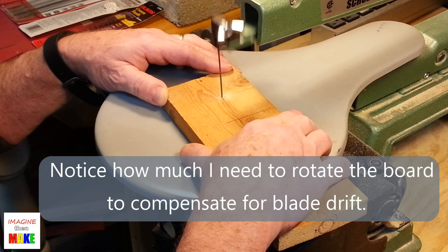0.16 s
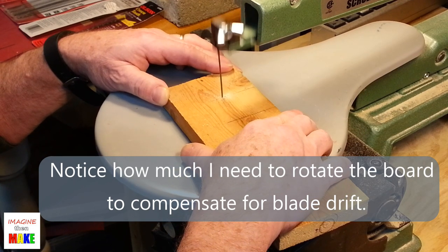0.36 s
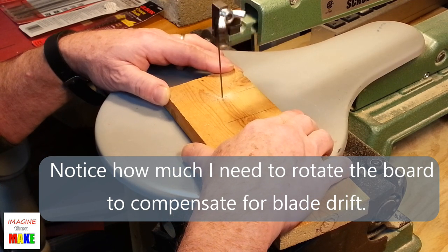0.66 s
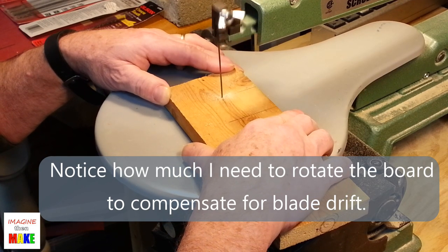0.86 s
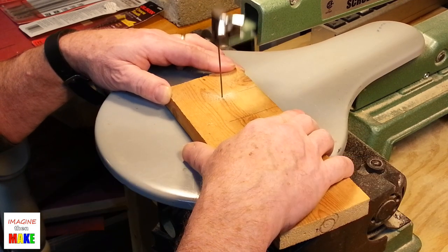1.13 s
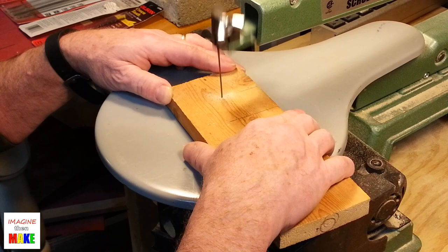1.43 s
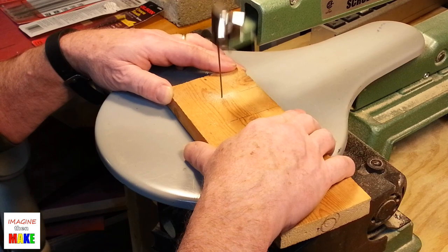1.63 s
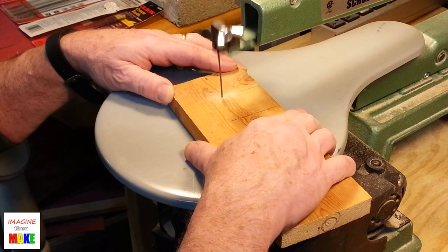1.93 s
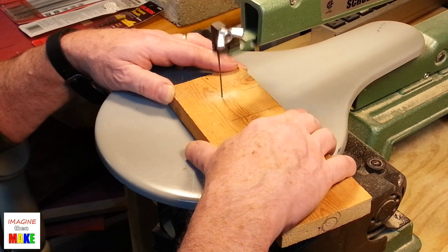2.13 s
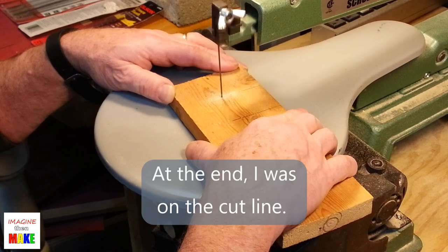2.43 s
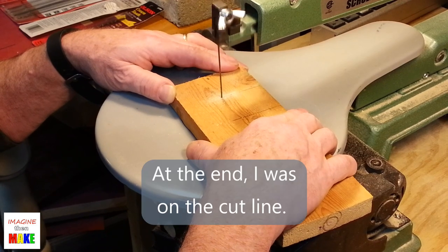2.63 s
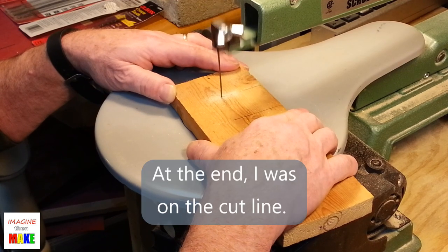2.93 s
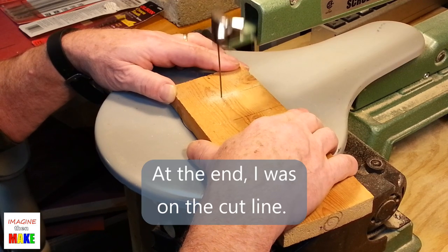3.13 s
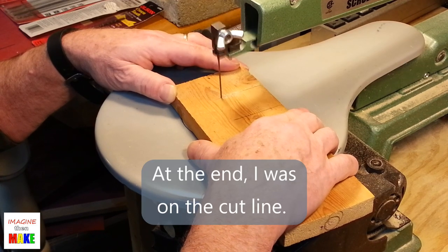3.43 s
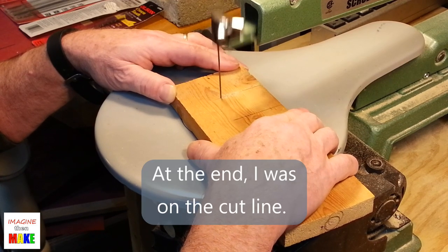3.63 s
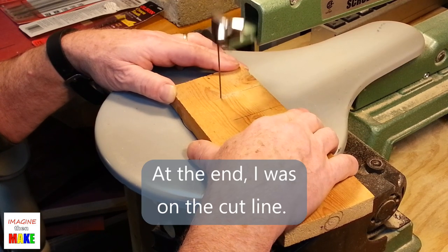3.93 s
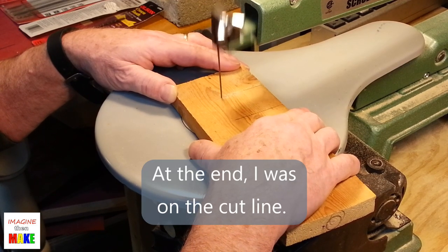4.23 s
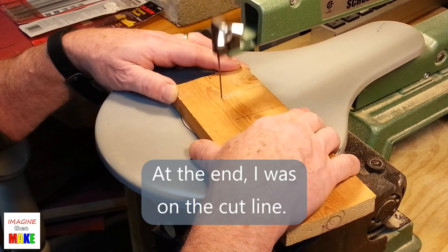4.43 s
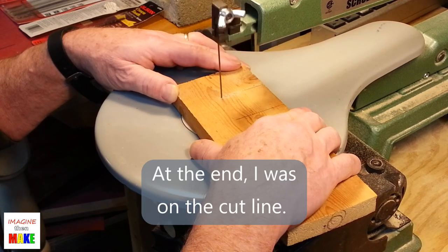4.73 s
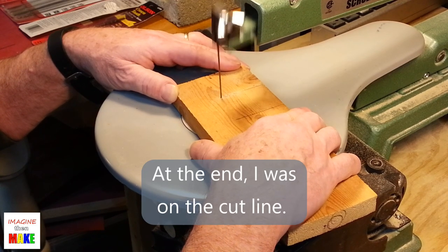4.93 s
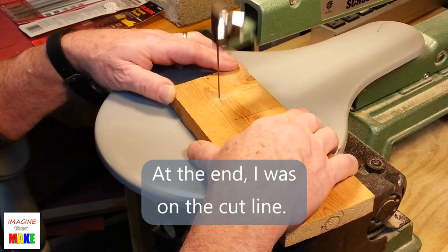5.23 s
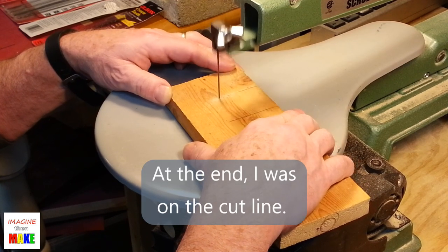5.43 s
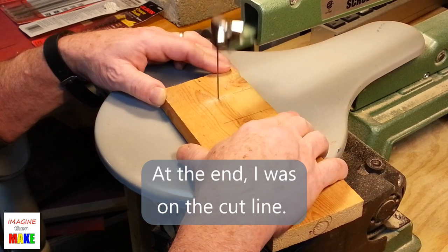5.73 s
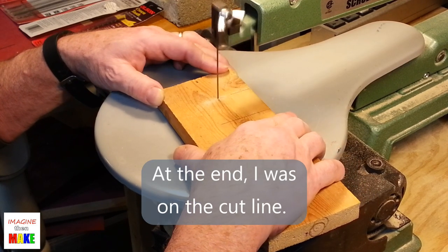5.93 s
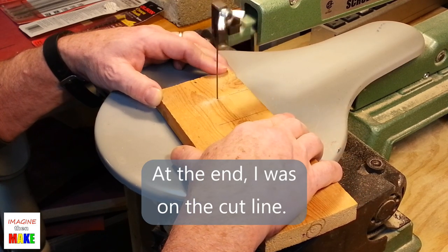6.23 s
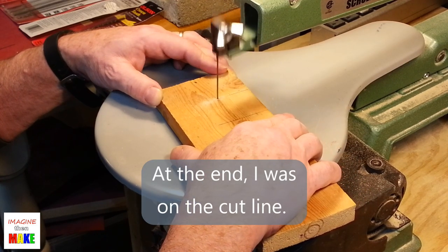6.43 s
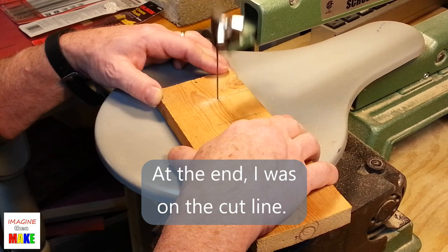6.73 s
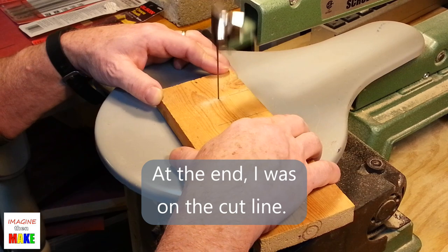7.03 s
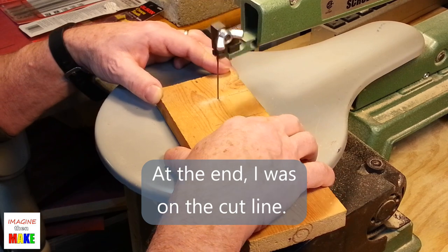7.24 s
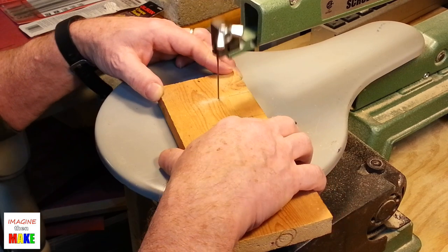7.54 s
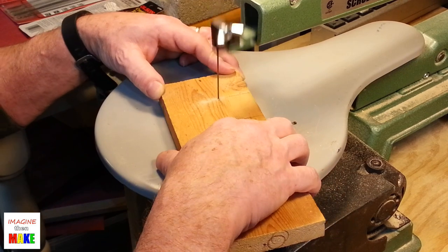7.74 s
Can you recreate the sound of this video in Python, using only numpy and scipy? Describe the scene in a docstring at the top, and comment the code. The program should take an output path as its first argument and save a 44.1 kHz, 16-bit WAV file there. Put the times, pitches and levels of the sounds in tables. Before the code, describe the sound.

A scroll saw cuts a pine board in a small workshop, heard close in stereo. Fast, gritty blade strokes rasp over a steady low motor hum while the board rings, chatters and knocks on the iron table. Early on, loose hollow slaps and splinter cracks stand out. The strokes quicken as the feed eases; after an instant of silence near six seconds, a lighter, rattling cut continues.

```python
"""A scroll saw rasps through a pine board in a small workshop, heard from close by over a motor hum.
The blade rasps on each downstroke and rubs on the way up; the board rings and rattles on the iron table.
Each part is noise, clicks or a tone timed by the crank, mostly shaped by the ringing of what it shakes.
A firm feed goes with slower strokes and more machine shake; now and then the grip eases and the board rattles up.
Near 6.1 s the sound drops out for an instant and a lighter cut goes on."""
import sys
import numpy as np
from scipy import signal
from scipy.fft import rfft, irfft, next_fast_len
from scipy.io import wavfile
from scipy.ndimage import uniform_filter1d, map_coordinates

SR = 44100
rng = np.random.default_rng(int(sys.argv[2]) if len(sys.argv) > 2 else 0)


def inscribe(sig):
    """Save sig as 16-bit PCM at rate SR to the path in sys.argv[1].

    A 1-D sig is mono; a 2-D sig holds one channel per row.
    Samples are clipped to [-1, 1] before scaling.
    """
    pcm = np.round(np.clip(np.atleast_2d(sig).T, -1, 1) * 32767)
    wavfile.write(sys.argv[1], SR, pcm.astype(np.int16))


N = 347067
T = np.arange(N) / SR   # time of every sample, s
SIZE = next_fast_len(N + SR)   # room for the ringing to die away
HZ = np.maximum(np.arange(SIZE // 2 + 1) * SR / SIZE, 1)   # frequency of every spectrum bin

# start and end of the short silence: (t/s, t/s)
BREAK_S = (6.077, 6.094)
# crank speed, sagging under load: (t/s, strokes per s)
SPEED = [(0, 15.15), (.35, 14.61), (1.09, 14.51), (1.78, 14.89), (2.35, 14.84), (3.37, 15.86),
         (3.82, 16.75), (4.1, 16.66), (4.35, 15.59), (4.92, 15.63), (5.32, 17.34), (6.08, 16.68),
         (6.09, 16.69), (6.63, 16.29), (7.04, 16.56), (7.4, 16.32), (7.87, 16.4)]
# how hard the hands feed the board, against a firm push: (t/s, feed/dB)
FEED = [(0, 0), (1.9, 0), (3.4, -1), (3.95, -6), (4.2, 0), (5.0, -2), (5.33, -10.5), (6.09, -9.5),
        (6.17, -4.5), (6.44, -7), (6.56, -5.5), (6.72, -3.5), (7.02, -9), (7.2, -4), (7.52, -8.5),
        (7.69, -6), (7.87, -9.5)]
# ringing modes of the board: (f/Hz, width/Hz, left level/dB, right level/dB)
BOARD_MODES = [(789.6, 32.5, -5.5, -8.5), (1077, 19, -2.5, 3.5), (1890, 50, -17, -16)]
# ringing modes of the arm, tugged on the upstroke and again on the way down:
# (f/Hz, width before repeats or damping/Hz, left level/dB, right level/dB,
#  down tug/turn 0-1, down tug level/dB)
ARM_MODES = [(1827, 67, -1, -1.5, 0.35, -2), (2099, 42, 3.5, -5.5, 0, -3), (2182, 35, 2.5, -3.5, 0, -1.5)]


def from_db(db):
    """Turn decibels into gain."""
    return 10 ** (np.asarray(db) / 20)


def ears_db(left_db, right_db):
    """Gains for the left and right ear."""
    return from_db([[left_db], [right_db]])


def rms_one(x):
    """Scale to unit power."""
    return x / np.sqrt(np.mean(x ** 2) + 1e-20)


def in_time(rows):
    """Read each column of a time curve at every sample."""
    s, *columns = np.transpose(rows)
    return [np.interp(T, s, column) for column in columns]


def in_turn(rows, turns):
    """Read each column of a curve that repeats every turn of the crank."""
    turn, *columns = np.transpose(rows)
    return [np.interp(turns, turn, column, period=1) for column in columns]


def in_frequency(rows):
    """Read each dB column of a spectrum as a gain at every frequency."""
    hz, *columns = np.transpose(rows)
    return from_db([np.interp(np.log(HZ), np.log(hz), column) for column in columns])


def drift(position, count):
    """Wander at random between values drawn at each whole step of position."""
    return np.interp(position, np.arange(count), rng.standard_normal(count))


def filtered(x, response):
    """Pass a signal through a frequency response."""
    return irfft(rfft(x, SIZE) * response, SIZE)[..., :N]


def resonance(hz, width_hz):
    """One damped mode lets through a narrow band, with gain 1 at its peak."""
    return 1 / (1 + 1j * (HZ ** 2 - hz ** 2) / (HZ * width_hz))


def body(colour, modes):
    """An object answers with a broad colour and louder modes, ringing only after the push."""
    power = in_frequency(colour) ** 2
    for hz, width, left, right in modes:
        power = power + np.abs(ears_db(left, right) * resonance(hz, width)) ** 2
    cepstrum = irfft(np.log(power / np.mean(power)), SIZE)
    # keeping one half of the cepstrum makes the ringing follow the push
    n = np.arange(SIZE)
    causal = (1 + np.sign(SIZE // 2 - n)) / 2 - (n == 0) / 2
    return np.exp(rfft(cepstrum * causal))


def struck(rows):
    """Place one click for each (t/s, level/dB) row."""
    blows = np.zeros(N)
    for s, db in rows:
        blows[int(s * SR)] = from_db(db)
    return blows


def taps(turns, at_turn, uneven_db, jitter_s):
    """Click at the same point of every turn, uneven in strength and timing."""
    at = np.flatnonzero(np.diff(np.floor(turns - at_turn)) == 1)
    size, late = rng.standard_normal((160, 2))[:len(at)].T
    places = at + (late * jitter_s * SR).astype(int)
    clicks = np.zeros(N)
    clicks[np.clip(places, 0, N - 1)] = from_db(uneven_db * np.clip(size, -2, 1.5))
    return clicks


def level(law):
    """Set the gain of one part from the feed, the crank speed and the grip.

    A law is (firm-cut level/dB, dB per dB of feed, dB per extra stroke per s,
    share of a loose spell, change after the break/dB)."""
    # the grip eases and the board's freedom changes: (middle t/s, half length/s, level/dB)
    loose_spells = [(0.142, 0.12, 1), (0.783, 0.086, -1), (1.144, 0.09, 2), (1.445, 0.064, 0),
                    (2.518, 0.42, 2), (3.247, 0.12, 2.5), (4.655, 0.27, 1.5)]
    loaded_speed = 15   # strokes per s in a firm cut
    firm_db, per_feed, per_stroke, loose_share, later_db = law
    (feed_db,), (speed,) = in_time(FEED), in_time(SPEED)
    loose_db = sum(db * np.exp(-((T - s) / length) ** 2) for s, length, db in loose_spells)
    db = firm_db + per_feed * feed_db + per_stroke * (speed - loaded_speed)
    db = db + loose_share * loose_db + later_db * (T > np.mean(BREAK_S))
    return from_db(db)


def held(x, firmness, size):
    """The hands damp large swings, so the vibration keeps a more even strength."""
    power = uniform_filter1d(np.mean(rms_one(x) ** 2, axis=0), size=size)
    return rms_one(x * (power + .02) ** (-np.clip(firmness, 0, 1) / 2))


def flexed(x, turns, bend_s, wander_s):
    """Blade tension rises and falls with each stroke, so the ringing bends in pitch."""
    lag = bend_s * np.sin(2 * np.pi * turns) + wander_s * drift(3 * turns, 600)
    return np.array([map_coordinates(ear, [(T - lag) * SR], order=3, mode="nearest") for ear in x])


def hollow(blows, damping, contact_hz):
    """Soft blows ring the low modes of board and table."""
    # board and table together: (f/Hz, width before damping/Hz, left level/dB, right level/dB)
    knock_modes = [(346.5, 16.8, 9, 6.5), (408, 22, 4, 1), (433, 14.5, 2.5, -2.5), (776, 62, -5, -8.5)]
    ring = sum(ears_db(left, right) * resonance(hz, width * damping)
               for hz, width, left, right in knock_modes)
    softness = 1 / (1 + 1j * HZ / contact_hz) ** 2
    return filtered(blows, ring * softness)


def crank():
    """The crank gives strokes per second, which add up to turns made."""
    # crank position at the start and after the break: (turns, turns)
    start_turns = (.698, .058)
    resumed = T > np.mean(BREAK_S)
    speed, = in_time(SPEED)
    before = start_turns[0] + np.cumsum(speed) / SR
    after = start_turns[1] + np.cumsum(speed * resumed) / SR
    return speed, np.where(resumed, after, before) + 100 * resumed   # whole turns keep the phase


def motor(turns, sway, pan_db):
    """Magnetic hum at twice the mains rate sways with the load of each stroke."""
    # hum tones: (multiple of the hum rate, level/dB)
    hum_tones = [(1, -2), (2, -5.5), (3, -15), (4, -22), (5, -16), (6, -21.5)]
    hum_law = (-35.5, 0.55, 0.5, 0, 5.5)
    hum_hz = 120
    hum = sum(from_db(db) * np.sin(2 * np.pi * (multiple * hum_hz * T + rng.random()))
              for multiple, db in hum_tones)
    swing = 1 + sway * np.cos(2 * np.pi * turns)
    return level(hum_law) * np.sqrt(2) * hum * swing * ears_db(pan_db, -pan_db)


def friction(turns, stroke_db, uneven_db, grain_db):
    """Fibres tear in dense grains under the stroke; half strokes differ in strength."""
    # each ear's own noise against the shared noise: (f/Hz, level/dB)
    ear_spread = [(30, 23), (100, -29), (350, -8), (700, -2.5), (1100, 0.5), (2000, 0.5), (4000, 0),
                  (12000, 24)]
    half_strokes = drift(2 * turns, 400)
    teeth = drift(1000 * T, 8000)
    spread = in_frequency(ear_spread)
    shared = rfft(rng.standard_normal(SIZE))
    own = rfft(rng.standard_normal((2, SIZE)))
    hiss = irfft((shared + spread * own) / np.sqrt(1 + spread ** 2), SIZE)[:, :N]
    return rms_one(hiss * from_db(stroke_db + uneven_db * half_strokes + grain_db * teeth))


def blade(turns, stroke_db, rasp_db, catch_db, patchy_db):
    """Teeth and splinters excite the steel, each half stroke favouring other modes."""
    # broad colour of the rasp: (f/Hz, left level/dB, right level/dB)
    rasp_colour = [(200, -32, -14), (596, -14, -4), (1450, -6, -5), (2000, -5, -5), (2400, -9, -10),
                   (2850, -1, -3), (3250, -3, -5), (3750, 2, -6), (4200, -5, -10), (5300, 1, -4),
                   (5900, -7, -8), (6500, -4, -4), (7550, -15, 0), (8200, -19, -11), (9200, -41, -19),
                   (10900, -62, -18), (11500, -65, -66)]
    # blade, clamps and arms: (f/Hz, width/Hz, left level/dB, right level/dB)
    blade_modes = [(3440, 110, 5, -6), (3990, 80, -2, 2), (4590, 60, 9, -5), (4755, 55, 11, 7),
                   (4880, 40, 11, -1), (4972, 50, 15, 8), (5190, 85, 13.5, 2), (6055, 35, -2, 3),
                   (6605, 90, 4, 4), (6922, 38, -7, 14), (7095, 80, 5, 12.5), (7412, 30, -14, 8)]
    feed_db, = in_time(FEED)
    teeth = from_db(feed_db + rasp_db) * friction(turns, stroke_db, uneven_db=0.2, grain_db=0.75)
    force = teeth + from_db(catch_db) * catches(crack_s=0.0034, tear_s=0.023, tear_db=-1.5)
    steel = body(rasp_colour, blade_modes)
    out = 0
    # bands in Hz, each with its own changing share
    for low, high in ((0, 4400), (4400, 4830), (4830, 5080), (5080, 5900), (5900, SR)):
        share_db = patchy_db * drift(2 * turns, 400)
        out = out + from_db(share_db) * filtered(force, steel * (HZ >= low) * (HZ < high))
    return flexed(out, turns, bend_s=1.5e-5, wander_s=2e-5)


def board(turns, ring_stroke_db, rattle_stroke_db):
    """The blade drags the board up and down: it rings and rattles against the table."""
    # broad colours of ringing and rattling: (f/Hz, left level/dB, right level/dB)
    board_colour = [(300, -75, -40), (706, -34, -45), (1080, -31, -62), (2140, -14.5, -35),
                    (2820, -69, -26), (8000, -84, -72)]
    rattle_colour = [(25, -17, -20), (70, -24, -30), (139, 4, 3), (181, -45, -44), (300, -13, -29),
                     (446, -11, -8), (527, 1.5, -22), (835, 4.5, -12), (1300, -32, -43), (4000, -108, -77)]
    # modes of the rattle: (f/Hz, width/Hz, left level/dB, right level/dB)
    rattle_modes = [(222, 6.1, -4, -15), (353.1, 6.8, 17.5, 13), (350, 6.8, -7, 9), (410, 9.4, 5, 8),
                    (760, 11, -3, 4)]
    ring_law = (-33.5, 1.5, -1, 1.5, -5)
    rattle_law = (-39.5, 0, -5.5, 1, 6.5)
    drag = friction(turns, ring_stroke_db, uneven_db=1.0, grain_db=7.5)
    ring = rms_one(filtered(drag, body(board_colour, BOARD_MODES)))
    contacts = friction(turns, 0, uneven_db=-1.5, grain_db=10.0)
    rattle = filtered(contacts, body(rattle_colour, rattle_modes))
    rattle = rms_one(held(rattle, firmness=0.95, size=900) * from_db(rattle_stroke_db))
    return level(ring_law) * ring + level(rattle_law) * rattle


def chatter(turns, load, up_turn, light_db):
    """Each tug of the blade sets the upper arm ringing; the down tug fades in a light cut."""
    chatter_law = (-34, 1.9, 2, 0.7, -24)
    ring = 0
    for hz, width, left, right, down_turn, down_db in ARM_MODES:
        up = taps(turns, up_turn, uneven_db=5.5, jitter_s=0.00121)
        down = taps(turns, down_turn, uneven_db=2.5, jitter_s=0.00228)
        down = down * from_db(down_db + light_db * (0.5 - load))
        mode = rms_one(filtered(up + down, resonance(hz, width) ** 2))
        ring = ring + ears_db(left, right) * mode
    return level(chatter_law) * rms_one(flexed(ring, turns, bend_s=4e-5, wander_s=8e-5))


def singing(turns, load, waver_hz, uneven_db, rough_db, thump_db, pan_db):
    """Stick and slip pump the board's main mode into a rough tone; a thump swells it."""
    # swell within a turn: (turn 0-1, light-cut level/dB, heavy-cut level/dB)
    sing_stroke = [(.12, -9, -13), (.25, 2, 4), (.41, -1, 4.5), (.56, -8, -4), (.72, -14, -15),
                   (.88, 4, -0.5), (.98, 3, -2)]
    # strength of the tone before any thump adds to it: (t/s, level/dB)
    sing_level = [(0, -27), (.4, -32), (.55, -39), (1.0, -32), (1.9, -34.5), (2.1, -31.5), (2.6, -28),
                  (3.0, -34.5), (3.25, -29), (3.6, -37), (3.8, -34), (4.12, -40), (4.22, -26),
                  (4.45, -33.5), (4.7, -31.5), (5.03, -31), (5.22, -45.5), (7.87, -55)]
    sing_hz = 1100   # main bending mode
    pitch, strength = drift(2 * turns, 400), drift(2 * turns, 400)
    slips = drift(300 * T, 2400)
    tone = np.sqrt(2) * np.sin(2 * np.pi * np.cumsum(sing_hz + waver_hz * pitch) / SR)
    light, heavy = in_turn(sing_stroke, turns)
    swell_db = light + load * (heavy - light)
    beads = rms_one(from_db(swell_db + uneven_db * strength + rough_db * slips))
    envelope = from_db(in_time(sing_level)[0]) * beads
    envelope = envelope + from_db(thump_db) * judder(swell_s=0.0091)
    return tone * envelope * ears_db(pan_db, -pan_db)


def knocks(turns, load, damping, contact_hz):
    """The lifted board drops back on the table with soft wooden knocks, damped by the hands."""
    # three drops a turn: (turn 0-1, heavy-cut level/dB, light-cut level/dB,
    #  turn after the break 0-1, level after the break/dB)
    drops = [(0.085, -3, -2.5, .25, -4.5), (.41, -4.5, -1, .55, -1.5), (0.72, -9, -2, .78, 4)]
    knock_law = (-33, 1.2, -4, 0.9, 4)
    blows, resumed = 0, T > BREAK_S[0]
    for turn, heavy, light, later_turn, later in drops:
        strength_db = np.where(resumed, later, light + load * (heavy - light))
        at_turn = np.where(resumed, later_turn, turn)
        blows = blows + from_db(strength_db) * taps(turns, at_turn, uneven_db=3.5, jitter_s=0.00089)
    return level(knock_law) * rms_one(hollow(blows, damping, contact_hz))


def frame(turns, count=70):
    """The linkage repeats one shudder every turn; its overtones slide through the frame's modes."""
    # cast frame, broad colour: (f/Hz, left level/dB, right level/dB)
    frame_colour = [(30, -61, -34), (86.5, -41, -13.5), (195, -35.5, -21), (283, -7, -38), (453, -45, -38),
                    (690, -19, -53), (1200, -29.5, -19)]
    # its modes: (f/Hz, width/Hz, left level/dB, right level/dB)
    frame_modes = [(103.1, 3.2, 2.5, 2.5), (229, 21, -1, -3), (316, 15, -5, -21), (356.2, 10.8, 10, 8),
                   (355, 6.6, -13.5, -45), (589.3, 8.6, -16, -14), (757, 10, -2.5, -6.5)]
    shudder_law = (-36, 0.48, -1.2, 1.98, 7.5)
    # equally strong overtones with random phases
    cycle = irfft(np.r_[0, np.exp(2j * np.pi * rng.random(count))], 2048)
    shudder = np.interp(turns, np.arange(len(cycle)) / len(cycle), cycle, period=1)
    return level(shudder_law) * rms_one(filtered(shudder, body(frame_colour, frame_modes)))


def pivots(turns, stroke_db, depth):
    """Play in the pivots and blade clamps clatters, only faintly following the stroke."""
    # broad colour of the joints: (f/Hz, left level/dB, right level/dB)
    clatter_colour = [(25, -32, -14), (200, -17, -9.5), (577, -15, -11), (895, -27, -43), (1520, -5, -9),
                      (2400, -10, -16), (3930, -12, -24), (7100, -7.5, -8.5), (10200, -37, -15.5),
                      (11900, -70, -48), (15000, -70, -70)]
    # their modes: (f/Hz, width/Hz, left level/dB, right level/dB)
    clatter_modes = [(762, 9.3, 2.5, -7), (1124, 21, 9.5, 5.5), (1254.5, 27, 8.5, 2), (2110, 49, 3.5, -3),
                     (3003, 130, -0.5, -2.5)]
    clatter_law = (-35, 0.5, 1, -2, 2.5)
    contacts = friction(turns, depth * stroke_db, uneven_db=1.5, grain_db=4.5)
    return level(clatter_law) * rms_one(filtered(contacts, body(clatter_colour, clatter_modes)))


def squeak(turns, first_turn, second_turn, length_turns, width_hz, left_db):
    """Narrow noise chirps at one point of the stroke, and at another point after the break."""
    squeak_law = (-56.5, -0.1, 8.5, -1, -1)
    squeak_hz = 10080
    at_turn = np.where(T > BREAK_S[0], second_turn, first_turn)
    away = (turns - at_turn + .5) % 1 - .5   # turns from the nearest chirp
    tone = rms_one(filtered(rng.standard_normal(N), resonance(squeak_hz, width_hz) ** 2))
    return level(squeak_law) * tone * np.exp(-(away / length_turns) ** 2) * ears_db(left_db, 0)


def clacks(gain_db, damping):
    """The blade snags and jerks the arm, whose lowest mode rings on its own."""
    # jerks: (t/s, relative level/dB)
    jerks = [(.379, -3), (1.134, -1), (1.75, -2), (1.815, -1.5), (2.749, -4), (2.946, 0), (4.691, -1)]
    hz, width, left, right = ARM_MODES[0][:4]
    ring = filtered(struck(jerks), resonance(hz, width * damping) ** 2)
    return from_db(gain_db) * ears_db(left, right) * ring


def judder(swell_s):
    """The board's swing swells quickly after each hard landing and settles."""
    # hard landings: (t/s, relative level/dB)
    landings = [(0.383, -28), (.594, -24), (0.648, -17), (1.464, -18), (2.405, -27), (4.237, -28),
                (4.677, -17), (7.704, -29)]
    total = 0
    for s, db in landings:
        age = np.maximum(T - s, 0) / swell_s
        total = total + from_db(db) * age * np.exp(1 - age)   # peaks at age 1
    return total


def thumps(swell_s, gain_db):
    """The board jumps and lands hard, a noise burst that shakes the whole board."""
    # broad colour, the same in both ears: (f/Hz, level/dB)
    thump_colour = [(100, -60), (350, -22), (900, -7), (1800, -33), (3000, -52), (8000, -75)]
    shake = judder(swell_s) * rng.standard_normal(N)
    return from_db(gain_db) * filtered(shake, body(thump_colour, BOARD_MODES))


def catches(crack_s, tear_s, tear_db):
    """Teeth catch and snap off a splinter: a sharp crack with a short tearing tail."""
    # caught teeth: (t/s, relative level/dB)
    splinters = [(0.6366, -9), (0.7042, -12.5), (0.7745, -18), (0.845, -11), (0.9153, -13), (0.982, -13),
                 (1.993, -20), (2.4034, -15), (2.538, -15), (2.8, -16), (2.996, -12), (3.295, -11),
                 (4.423, -14), (5.9225, -20), (6.153, -13), (6.211, -11), (6.549, -11), (6.6745, -14),
                 (6.8225, -15), (7.433, -12.5)]
    force = np.zeros(N)
    age = np.arange(SR // 20) / SR
    shape = np.exp(-age / crack_s) + from_db(tear_db) * np.exp(-age / tear_s)
    for s, db in splinters:
        at = int(s * SR)
        force[at:at + len(age)] += from_db(db) * shape * rng.standard_normal(len(age))
    return force


def slaps(gain_db, damping, contact_hz):
    """The board is lifted clear and one end slaps the table: a single hollow knock."""
    # slaps: (t/s, relative level/dB)
    slap_times = [(.725, -28), (.796, -4.5), (0.859, -7), (.933, -17), (1.069, -5.5), (1.138, -5),
                  (1.186, -12), (1.276, -20), (1.342, -12), (1.412, -6), (1.456, -5), (2.288, -10),
                  (2.401, -17), (2.623, -6), (4.633, -9)]
    return from_db(gain_db) * hollow(struck(slap_times), damping, contact_hz)


def workshop(x, near_t60, room_t60, room_db, wet_db):
    """Table, bench and walls add quick echoes and a faint room tail, different for each ear."""
    # colour of the echoes: (f/Hz, relative level/dB)
    scatter = [(100, -50), (350, -29), (700, -29.5), (1100, -62), (2000, 3.5), (4000, 12.5), (12000, -28)]
    age = np.arange(SR // 2) / SR
    near = from_db(-60 * age / near_t60)
    room = from_db(room_db - 60 * age / room_t60)
    decay = (near + room) * (age > .0004)   # no echo arrives at once
    echoes = rng.standard_normal((2, len(age))) * decay / np.sqrt(np.sum(decay ** 2))
    wet = in_frequency(scatter) * from_db(wet_db)
    return filtered(x, (1 + wet * rfft(echoes, SIZE)) / np.sqrt(1 + wet ** 2))


def scene():
    """All moving parts follow the crank; the blade is nearest and the driest."""
    # one turn, downstroke first: (turn 0-1, light-cut rasp/dB, heavy-cut rasp/dB,
    #  rasp after the break/dB, board ringing/dB, rattle/dB)
    stroke_rows = [(.02, -7, -6, -9.5, -7, -13), (.11, 3, 6.5, 1, 4, -3), (.22, 4.5, 4.5, 1.5, -5, 2.5),
                   (.32, -1, 3, 6.5, 3, -2), (.43, -0.5, -4, -1, 1.5, -2), (.55, -9, -8, -4, -5.5, 1.5),
                   (.66, -3, 0, 3.5, -32, 2), (.78, 6, 0.5, 1.5, -1, -6),
                   (.89, 2.5, -3.5, -4.5, -0.5, -2.5)]
    speed, turns = crank()
    light, heavy, later, ring, rattle = in_turn(stroke_rows, turns)
    load = np.clip((17.2 - speed) / 3.47, 0, 1)   # the motor slows as the blade bites
    stroke = np.where(T > BREAK_S[0], later, light + load * (heavy - light))
    bite = stroke * (1 - 0.02 * in_time(FEED)[0])   # swing grows 2 % per dB of lighter feed
    rasp = blade(turns, bite, rasp_db=-21.5, catch_db=-11.0, patchy_db=2.0)
    saw = board(turns, ring, rattle)
    saw = saw + chatter(turns, load, up_turn=.66, light_db=-3)
    saw = saw + singing(turns, load, waver_hz=8.83, uneven_db=3.2, rough_db=2.5, thump_db=-9, pan_db=1)
    saw = saw + knocks(turns, load, damping=0.68, contact_hz=900)
    saw = saw + frame(turns) + pivots(turns, stroke, depth=0.078)
    saw = saw + squeak(turns, first_turn=1.0, second_turn=0.4, length_turns=0.094,
                       width_hz=230, left_db=-35)
    saw = saw + clacks(gain_db=27.5, damping=0.99) + thumps(swell_s=0.01, gain_db=-9)
    saw = saw + slaps(gain_db=32.5, damping=0.83, contact_hz=600)
    near = workshop(rasp, near_t60=0.026, room_t60=0.19, room_db=-11, wet_db=-8)
    around = workshop(saw, near_t60=0.014, room_t60=0.31, room_db=-8.0, wet_db=-0.5)
    return near + around + motor(turns, sway=0.24, pan_db=0.9)


def record(dry):
    """The sound drops out for an instant; a steep filter cuts the top."""
    cutoff_hz = 14800
    sounding = (T < BREAK_S[0]) | (T > BREAK_S[1])
    gate = uniform_filter1d(1. * sounding, size=100)   # short fades at both edges
    top_cut = signal.ellip(10, .1, 90, cutoff_hz, fs=SR, output="sos")
    return signal.sosfilt(top_cut, dry * gate)


dry = scene()
out = record(dry)
inscribe(out)
```